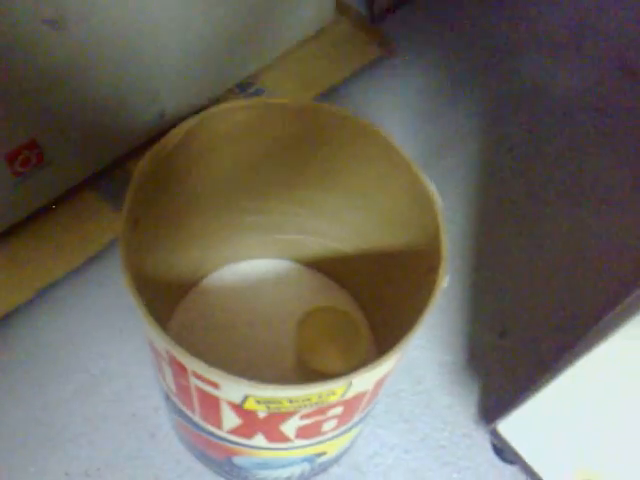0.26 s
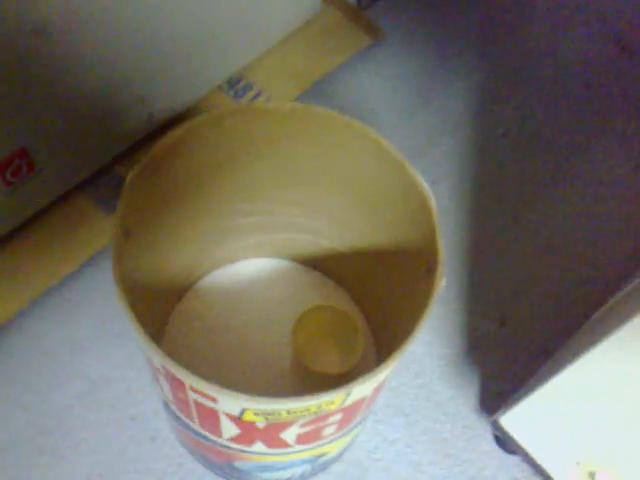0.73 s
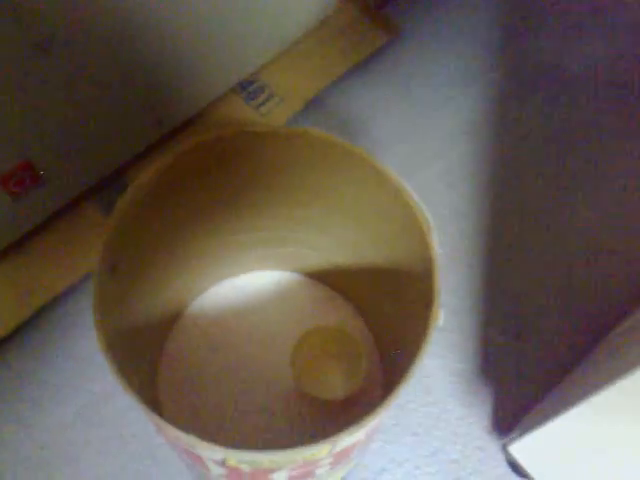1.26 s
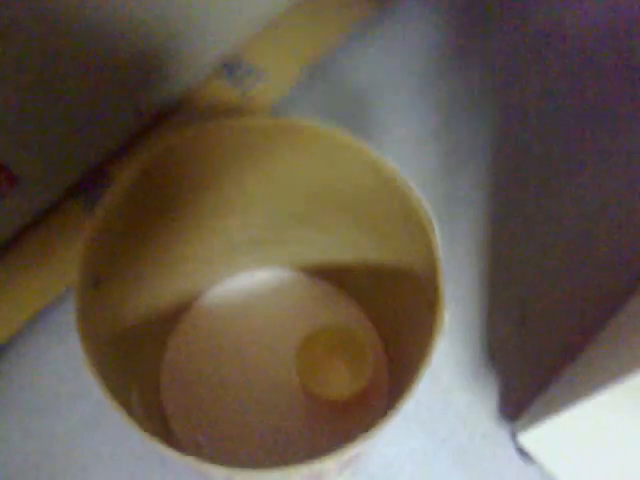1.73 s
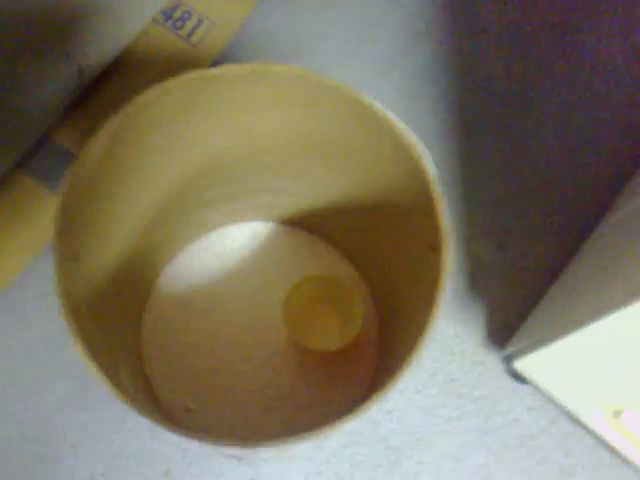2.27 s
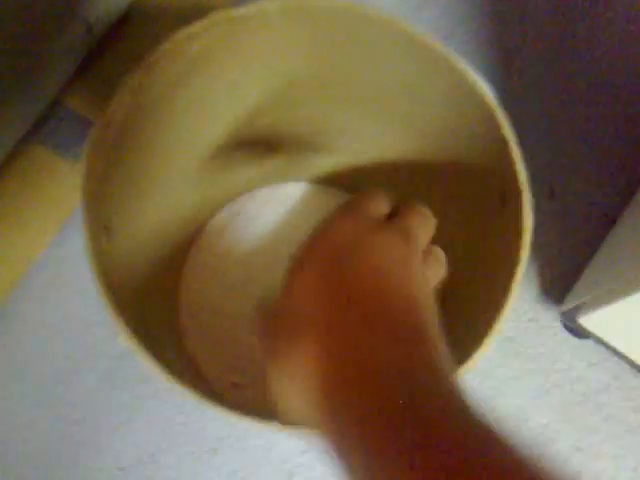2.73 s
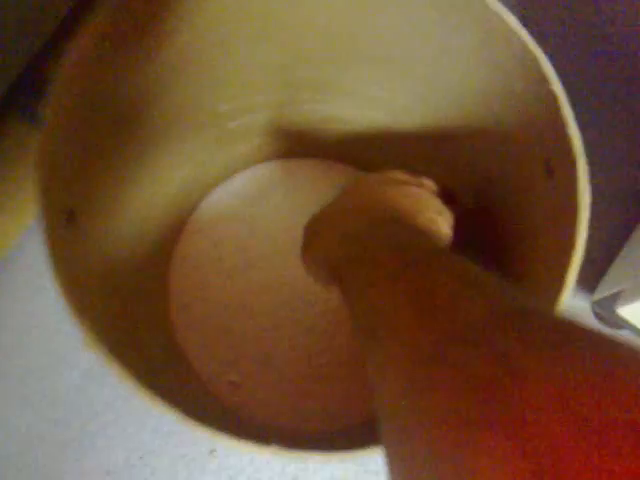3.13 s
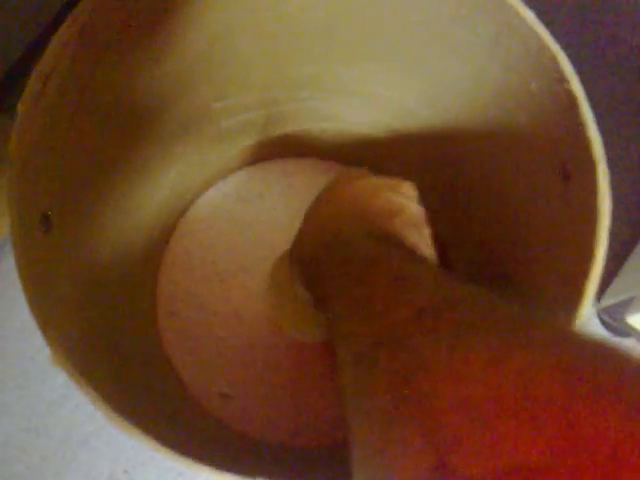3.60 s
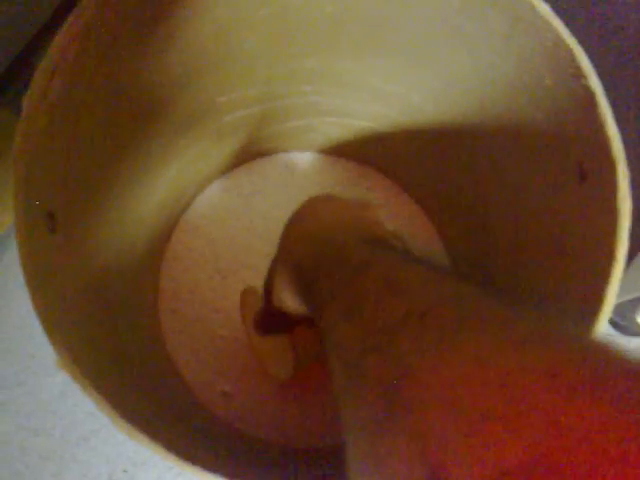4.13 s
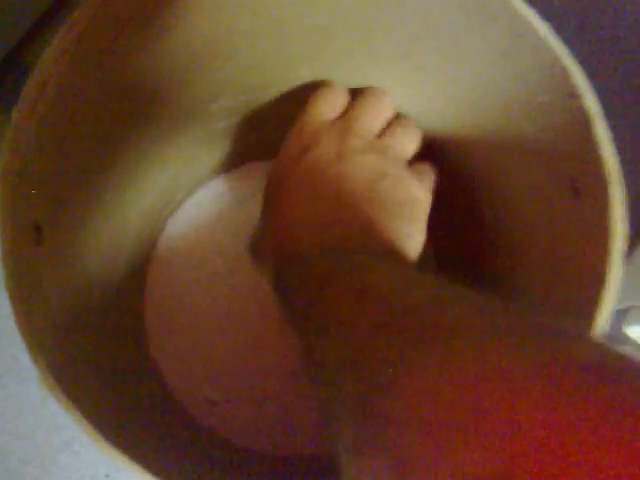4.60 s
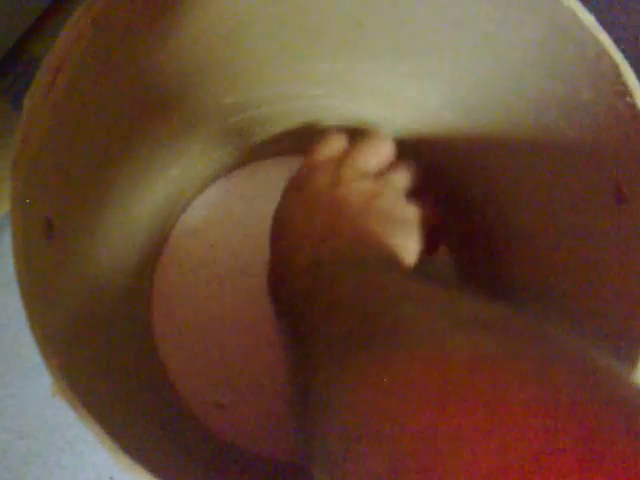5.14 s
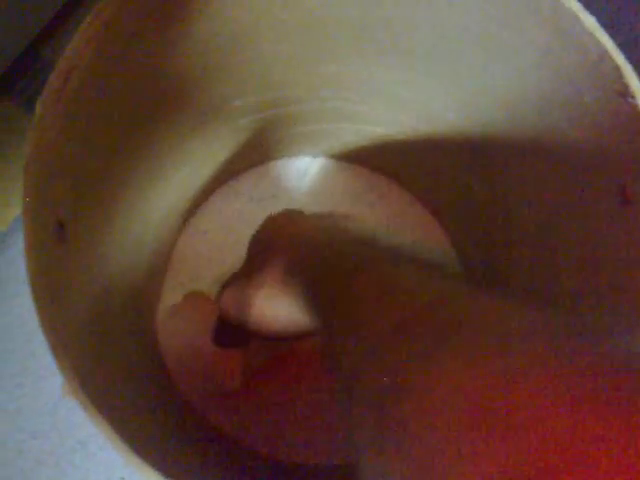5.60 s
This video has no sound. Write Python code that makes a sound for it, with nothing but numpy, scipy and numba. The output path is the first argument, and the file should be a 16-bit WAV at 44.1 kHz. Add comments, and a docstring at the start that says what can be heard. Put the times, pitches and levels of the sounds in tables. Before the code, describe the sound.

A small room with faint low rumble and hum, heard through a close mono recorder with steady bright hiss and thin high whine. At about 0.6 s a cardboard lid scrapes faintly, then clacks lightly at 0.73-0.84 s with short skids. A firmer hollow double knock comes at 1.16 s, a faint low groan near 1.36 s, then the loudest event: a tight clatter of booming thumps and a hard rim clack at 1.49-1.52 s, with weaker thuds to 1.63 s and a short boomy echo. The recorder's level dips and recovers. From 2.5 s a sleeve brushes softly; dull finger taps fall at 2.73 s. A plastic cup ticks brightly at 3.65 s, with tiny scuffs until about 4 s. A crisp, hollow wall tap sounds at 4.69 s, followed by lighter taps and dry skin rubs along the cardboard until about 5.5 s, then a last faint brush at 5.8 s.

```python
"""Cardboard drum lid knocked down, open drum explored by hand

A cardboard drum's lid scrapes, clacks and thumps as it is set down in a small room: blows ring damped modes.
Then a hand reaches into the open drum, nudges a plastic cup, taps the wall and slides along it:
light blows ring fewer modes, and friction is noise made of tiny slips around a chatter pitch.
A faint hum fills the room; a small mono recorder adds hiss and whine and ducks after the thumps.
"""
import sys
import numpy as np
from scipy import signal
from scipy.fft import rfft, irfft, next_fast_len
from scipy.io import wavfile
from scipy.ndimage import uniform_filter1d, minimum_filter1d
from numba import njit

SR = 44100
rng = np.random.default_rng(int(sys.argv[2]) if len(sys.argv) > 2 else 0)


def wav_out(sig):
    """Save sig, one row per channel (or a flat mono array), as 16-bit PCM at SR to the path in sys.argv[1]."""
    wavfile.write(sys.argv[1], SR, np.round(np.clip(np.atleast_2d(sig).T, -1, 1) * 32767).astype(np.int16))


N = 258867
TIME = np.arange(N) / SR  # s
RING = TIME[:SR]  # one second, the longest that a single contact sounds

# All levels in the tables are relative; each source sets its own balance.
# blows on the lid; spot_hz is the pitch that the struck spot favours:
# start_s, thump_db, contact_hz (corner), clack_db (rim), spot_hz
LID_BLOWS = [(0.734, -23, 1540, -12.5, 715), (0.7806, -24, 800, -33, 211), (0.837, -28.5, 900, -38, 213),
             (1.160, -9.5, 1160, -52, 565), (1.169, -8, 1070, -22, 195), (1.187, -14, 910, -42, 260),
             (1.4905, -4, 322, -62, 375), (1.4996, 1, 1020, -7, 403), (1.5053, -2.5, 1430, -16, 1310),
             (1.512, -2, 400, -32, 190), (1.521, -4, 506, -40, 440), (1.5961, -7, 620, -25.5, 211),
             (1.634, -4, 336, -54, 196)]
# modes of the lid's stiff rim: pitch_hz, level_db, t60_s
RIM_MODES = [(237, 10.5, 0.028), (544, 7, 0.048), (733, 8, 0.048), (1236, -0.5, 0.03), (1720, 11.5, 0.013),
             (2120, -1.5, 0.026), (2420, 1.5, 0.019), (3480, -14, 0.047)]
# modes of the drum's wall and the air inside: pitch_hz, level_db, t60_s
WALL_MODES = [(215, -14.5, 0.052), (304, -6, 0.016), (486, -13.5, 0.036), (597, -11, 0.027),
              (710, -8.5, 0.029), (770, -6.5, 0.046), (920, -5, 0.029), (1146, -1.5, 0.036),
              (1320, -1.5, 0.0058), (1830, -23, 0.028), (2390, -19.5, 0.03), (3480, -15, 0.032),
              (4630, -20, 0.042), (7300, -31, .015)]
# modes of the plastic cup: pitch_hz, level_db, t60_s
CUP_MODES = [(557, 1.5, 0.063), (1116, 1, 0.1), (2520, 0, .015), (3730, -16, .03), (4660, 3, 0.035),
             (4800, -3, 0.014), (5700, 3, 0.017), (6800, -14, .012)]
# friction noise of the lid's edge: frequency_hz, density_db (per Hz)
EDGE_FRICTION = [(100, -2), (400, 2), (800, 4), (1100, 0), (1700, 0), (2400, -2), (3200, -5), (5200, -11),
                 (8000, -17.5), (16000, -22)]
# friction noise of skin: frequency_hz, density_db (per Hz)
SKIN_FRICTION = [(100, -18), (300, 12), (1000, -4), (1700, 7), (3500, 5.5), (4700, 7), (7500, 7),
                 (10000, 0), (16000, -8)]


def undb(db):
    """Amplitude ratio: twenty decibels make a factor of ten."""
    return 10 ** (np.asarray(db) / 20)


def unit(x):
    """Normalisation: scale to an rms of one."""
    return x / np.sqrt(np.mean(x ** 2))


def along(hz, table, axis=1):
    """Interpolation: read one column of a table on a log-frequency axis."""
    table = np.array(table)
    return np.interp(np.log(hz + 1), np.log(table[:, 0]), table[:, axis])


def shape(x, gain):
    """Linear filtering: multiply the spectrum by a gain that is a function of frequency."""
    size = next_fast_len(len(x))
    freq = np.fft.rfftfreq(size, 1 / SR)
    return irfft(rfft(x, size) * gain(freq), size)[:len(x)]


def colour(x, spectrum):
    """Spectral shaping: weight a signal by a (Hz, dB) curve and give it an rms of one."""
    return unit(shape(x, lambda hz: undb(along(hz, spectrum))))


def add(track, s, sound):
    """Superposition: mix a sound in from a given time on."""
    start = max(int(s * SR), 0)
    track[start:start + len(sound)] += sound[:N - start]


def modes(table, scatter_db=3.0):
    """Modal ringing: damped sines, neighbours starting in opposite directions, no two blows alike."""
    hz, db, t60 = np.array(table).T[:, :, None]
    gain = undb(db + scatter_db * rng.standard_normal(db.shape))
    gain[1::2] *= -1
    decay = undb(-60 * RING / t60)
    ringing = np.sum(gain * decay * np.sin(2 * np.pi * hz * RING), axis=0)
    return ringing / np.sum(undb(db))


def tail(table, t):
    """Diffuse decay: noise that dies away at its own pace in each half octave; unit energy."""
    noise = rfft(rng.standard_normal(len(t)))
    freq = np.fft.rfftfreq(len(t), 1 / SR)
    out = 0
    for hz in 45 * 2 ** (np.arange(18) / 2):
        # triangular bands on an octave axis, crossing over into their neighbours
        window = np.maximum(1 - 2 * np.abs(np.log2((freq + 1) / hz)), 0)
        band = irfft(noise * window, len(t))
        decay = np.exp(-np.log(1000) * t / along(hz, table, axis=2))
        out = out + band * undb(along(hz, table)) * decay
    return out / np.sqrt(np.sum(out ** 2))


def soften(x, hz):
    """Contact stiffness: a softer contact pushes for longer and excites less treble."""
    return signal.sosfilt(signal.butter(2, min(hz, SR / 3), fs=SR, output="sos"), x)


def radiate(x, hz):
    """Acoustic short circuit: air slips round a small panel, so its deepest bass is lost."""
    return signal.sosfilt(signal.butter(2, hz, "high", fs=SR, output="sos"), x)


def resonate(x, hz, q):
    """Resonance: one band-pass peak with a gain of one at its centre."""
    return signal.lfilter(*signal.iirpeak(hz, q, fs=SR), x)


def crack(decay_s):
    """Impact noise: the brief broadband crush of fibres at the contact."""
    return rng.standard_normal(len(RING)) * np.exp(-RING / decay_s)


def slips(grain_db):
    """Stick-slip friction: a second of tiny slips under a grip that changes every 64 samples."""
    steps = np.repeat(rng.standard_normal(len(RING)), 64)[:len(RING)]
    return undb(grain_db * steps) * rng.standard_normal(len(RING))


def lid_knocks(crack_db=-16, clack_db=7):
    """Impact: each blow booms in the panel, clacks the rim, and rebounds weaker and softer."""
    # the lid rocks back once onto its far side
    rebound_s, rebound_scatter, rebound_db = .03, 0.0614, -12
    rebound_softness, rebound_hz = 0.62, 397  # factor on the contact corner; favoured pitch
    out = np.zeros(N)
    for s, thump_db, contact_hz, rim_db, spot_hz in LID_BLOWS:
        rim = undb(clack_db) * modes(RIM_MODES) + undb(crack_db) * crack(decay_s=0.0019)
        thump = soften(panel(spot_hz), contact_hz)
        add(out, s, undb(thump_db) * thump + undb(rim_db) * radiate(rim, hz=394))
        gap_s = rebound_s * np.exp(rebound_scatter * rng.standard_normal())
        rebound = soften(panel(rebound_hz), contact_hz * rebound_softness)
        add(out, s + gap_s, undb(thump_db + rebound_db) * rebound)
    return out


def panel(spot_hz, dense_db=10, panel_db=7, spot_db=8.5):
    """Plate vibration: the lid's boom, coloured by the spot where it is struck."""
    # the lid's panel, booming when knocked: pitch_hz, level_db, t60_s
    low_modes = [(63, -3.5, 0.066), (88.8, -11, 0.2), (120.5, -13, 0.17), (196.5, 1, 0.12),
                 (226.9, -10.5, 0.23), (261.6, -4.5, 0.17), (357, -5.5, 0.052), (383, -6, 0.12),
                 (431.8, -3, 0.16), (499.5, -3.5, 0.11), (605, -1.5, 0.041), (850, -2.5, 0.033),
                 (1007, -7.5, 0.046), (1296, -8, 0.023), (1760, -15.5, 0.079), (2220, -7, 0.063)]
    # its crowded, damped higher modes: frequency_hz, density_db (per Hz), t60_s
    crowded_modes = [(45, -46, .3), (113, -6.5, 0.82), (208, -17, 0.81), (310, -10, 0.46), (497, 0.5, 0.3),
                     (1000, -8, 0.42), (2500, -21, 0.53), (4200, -35, 0.079), (10000, -44, .08),
                     (16000, -26, .04)]
    body = undb(panel_db) * radiate(modes(low_modes), hz=102)
    body[:SR // 3] += undb(dense_db) * tail(crowded_modes, RING[:SR // 3])
    # lift the favoured pitch by spot_db
    return body + (undb(spot_db) - 1) * resonate(body, spot_hz, q=3.2)


def edge_drag(grain_db=2.0):
    """Sliding friction: the lid's edge skids after every blow, louder for a harder contact."""
    # level against the thump, for a contact corner at ref_hz
    drag_db, db_per_octave, ref_hz = -24.5, 7, 996
    rise_s, fall_s = 0.0038, 0.024
    out = np.zeros(N)
    skid = (1 - np.exp(-RING / rise_s)) * np.exp(-RING / fall_s)
    for s, thump_db, contact_hz, _, _ in LID_BLOWS:
        db = thump_db + drag_db + db_per_octave * np.log2(contact_hz / ref_hz)
        add(out, s, undb(db) * skid * colour(slips(grain_db), EDGE_FRICTION))
    return out


def rubs(table, grit, ring, ring_db, grain_db, chatter_db, rise_share, chatter_q=4.6):
    """Stick-slip: uneven slips bunch around a chatter pitch and ring the rubbed object."""
    bluntness = 1.66  # of the peak in speed: each stroke speeds up and slows down again
    out, t = np.zeros(N), RING - .5
    for s, length, db, tilt_db, chatter_hz in table:
        force = slips(grain_db)
        body = unit(signal.fftconvolve(force, modes(ring))[:len(t)])
        sound = colour(force, grit) + undb(ring_db) * body
        sound = unit(shape(sound, lambda hz: undb(tilt_db * np.log2(np.clip(hz, 300, 8000)))))
        chatter = resonate(force, chatter_hz, chatter_q)
        chatter = unit(resonate(chatter, chatter_hz, chatter_q))
        width = length * np.where(t < 0, rise_share, 1 - rise_share)
        speed = np.exp(-.5 * np.abs(t / width) ** bluntness)
        add(out, s - .5, undb(db) * speed * (sound + undb(chatter_db) * chatter))
    return out


def lid_scrapes():
    """Sliding friction: the lid's edge drags between blows and rings its rim."""
    # peak_s, length_s, level_db, tilt_db_per_octave, chatter_hz
    strokes = [(0.612, 0.014, -42.5, 2, 1500), (0.755, 0.034, -41.5, 0, 2270),
               (0.827, 0.032, -39.5, 0.5, 1740), (1.442, 0.063, -42, -7, 406), (1.63, .05, -40, -4, 4790)]
    return rubs(strokes, EDGE_FRICTION, RIM_MODES, ring_db=-20, grain_db=1.0, chatter_db=-9.5,
                rise_share=0.32)


def lid_groan():
    """Stick-slip at a low pitch: the lid's edge drags with a low groan, mostly chatter."""
    # peak_s, length_s, level_db, tilt_db_per_octave, chatter_hz
    strokes = [(1.361, .03, -53.5, 4, 183)]
    return rubs(strokes, EDGE_FRICTION, RIM_MODES, ring_db=-24, grain_db=0.0, chatter_db=17.5,
                rise_share=0.3)


def taps(table, ring, ring_db, crack_db, low_hz):
    """Impact: light blows ring the modes of one object."""
    out = np.zeros(N)
    for s, db, contact_hz in table:
        blow = undb(ring_db) * modes(ring) + undb(crack_db) * radiate(crack(decay_s=0.0033), hz=1900)
        add(out, s, undb(db) * soften(blow, contact_hz))
    return radiate(out, low_hz)


def wall_taps():
    """Impact: fingers tap the drum's wall."""
    # start_s, level_db, contact_hz (corner)
    blows = [(2.728, -26, 520), (2.751, -36, 494), (4.6865, -9, 3020), (4.736, -38, 2000),
             (4.784, -32, 2500), (5.049, -28, 1800)]
    return taps(blows, WALL_MODES, ring_db=8.5, crack_db=-8.5, low_hz=150)


def cup_taps():
    """Impact: bright, hard contacts nudge the plastic cup."""
    # start_s, level_db, contact_hz (corner)
    blows = [(3.509, -44, 5900), (3.6505, -24.5, 8950)]
    return taps(blows, CUP_MODES, ring_db=4.5, crack_db=-7, low_hz=300)


def wall_rubs():
    """Sliding friction: skin slides on the wall and rings it."""
    # peak_s, length_s, level_db, tilt_db_per_octave, chatter_hz
    strokes = [(3.445, 0.053, -47.5, 0.5, 1290), (4.788, 0.033, -40.5, 1, 755),
               (4.905, 0.029, -47.5, 0, 1100), (5.028, 0.042, -38.5, -0.3, 750),
               (5.11, 0.13, -52.5, 1.5, 4670), (5.29, 0.2, -42.5, 2, 725)]
    return rubs(strokes, SKIN_FRICTION, WALL_MODES, ring_db=-9.5, grain_db=1.0, chatter_db=-6.0,
                rise_share=0.45)


def cup_scuffs():
    """Sliding friction: the cup slides under the fingers and rings."""
    # peak_s, length_s, level_db, tilt_db_per_octave, chatter_hz
    strokes = [(3.556, 0.024, -49, 3.5, 4630), (3.613, 0.032, -49, 4, 4650), (3.75, 0.21, -57, -0.5, 3800),
               (4.02, .08, -55, 7, 4760)]
    return rubs(strokes, SKIN_FRICTION, CUP_MODES, ring_db=-2, grain_db=1, chatter_db=-9,
                rise_share=0.41)


def sleeve_rubs():
    """Sliding friction: the sleeve brushes past the wall."""
    # peak_s, length_s, level_db, tilt_db_per_octave, chatter_hz
    strokes = [(2.52, 0.2, -54, -2.5, 2320), (2.8, 0.53, -56.5, -4, 3270), (3.136, 0.049, -48, 0, 3400),
               (4.625, 0.13, -51.5, 3, 3360), (4.712, 0.019, -41.5, -4, 3730), (5.82, .1, -50.5, 2, 3200)]
    # friction noise of cloth: frequency_hz, density_db (per Hz)
    cloth_friction = [(100, -31), (500, 8), (900, -2.5), (2300, 5), (3500, 5), (4400, -3), (8000, -7),
                      (16000, -68)]
    return rubs(strokes, cloth_friction, WALL_MODES, ring_db=-10, grain_db=1.0, chatter_db=-12,
                rise_share=0.27)


def room_echo(source, level_db=-8):
    """Reverberation: convolve with two seconds of noise that decays at each band's own rate."""
    # frequency_hz, density_db (per Hz), t60_s
    room = [(60.4, 2, 2.9), (120, 1.5, 1.63), (231, -3, 0.88), (476, 4.5, 0.73), (1050, 2.5, 0.33),
            (3000, 2, 0.83), (7950, -2, 0.38), (16000, 17.5, 0.21)]
    return undb(level_db) * signal.fftconvolve(source, tail(room, TIME[:2 * SR]))[:N]


def background(room_tone_db=-54):
    """Coloured noise and frequency modulation: room rumble, mains hum, the recorder's unsteady whine."""
    # steady room tone: frequency_hz, density_db (per Hz)
    room_tone = [(20, -4.5), (60, -0.5), (130, -3), (250, -2), (480, -6.5), (650, -8.5), (1200, -11.5),
                 (3000, -16), (16000, -24)]
    # hum and whine, level and wander as rms: pitch_hz, level_db, wander_hz, wanders_per_s
    tones = [(399.4, -64, 0.47, 5.6), (704, -73, 0.55, 27), (7595, -62, 48, 190), (15300, -59, 130, 510)]
    out = undb(room_tone_db) * colour(rng.standard_normal(N), room_tone)
    for hz, db, wander_hz, rate in tones:
        pitch = hz + wander_hz * unit(soften(rng.standard_normal(N), rate / 2))
        phase = 2 * np.pi * np.cumsum(pitch) / SR
        out += undb(db) * np.sqrt(2) * np.sin(phase)
    return out


def scene():
    """Superposition: lid, hand, their shared echo (the hand feeds it 1 dB less) and background."""
    lid = lid_knocks() + edge_drag() + lid_scrapes() + lid_groan()
    hand = wall_taps() + cup_taps() + wall_rubs() + cup_scuffs() + sleeve_rubs()
    echo = room_echo(lid + undb(-1.0) * hand)
    mono = lid + hand + echo + background()
    return np.array([mono, mono])


@njit
def follow(x, attack, release):
    """Envelope detection: one-pole smoothing with separate rates for rising and sinking."""
    out, e = np.empty(len(x)), 0.
    for i in range(len(x)):
        e += (x[i] - e) * (attack if x[i] > e else release)
        out[i] = e
    return out


def record(dry, attack_s=0.15, release_s=0.46, knee_db=-27, squeeze=0.68, hiss_db=-46.5, top_hz=15720):
    """Compression: gain ducks after loud blows, a fast limiter holds peaks, hiss joins, the top is cut."""
    # the recorder's hiss: frequency_hz, density_db (per Hz)
    hiss_spectrum = [(20, -53), (2000, -17), (4000, -11), (6500, -7), (9000, -4), (12000, -1.5), (15000, 0),
                     (16000, -0.5)]
    loudness = follow(np.abs(dry[0]), 1 / (attack_s * SR), 1 / (release_s * SR))
    ducked = dry * np.maximum(loudness / undb(knee_db), 1) ** -squeeze
    peaks = follow(np.abs(ducked[0]), 1., 1 / (.015 * SR))
    headroom = np.minimum(.52 / (peaks + 1e-9), 1)
    # the limiter eases in just ahead of each peak
    limited = ducked * uniform_filter1d(minimum_filter1d(headroom, size=129), size=129)
    hiss = undb(hiss_db) * colour(rng.standard_normal(N), hiss_spectrum)
    steep_cut = signal.ellip(12, .2, 80, top_hz, fs=SR, output="sos")
    return signal.sosfilt(steep_cut, limited + hiss)


dry = scene()
out = record(dry)
wav_out(out)
```